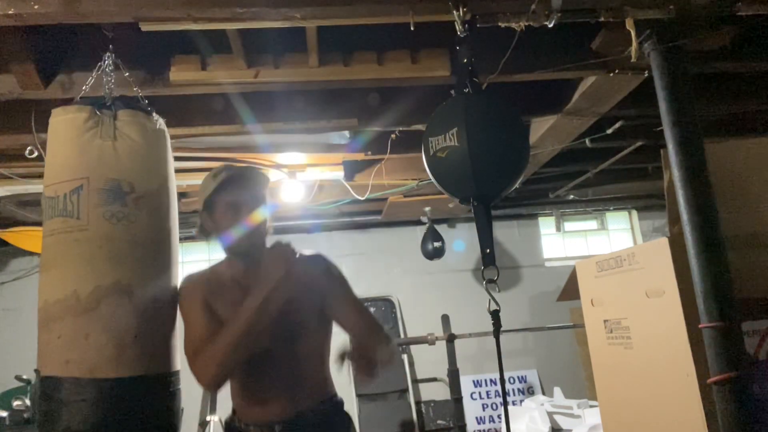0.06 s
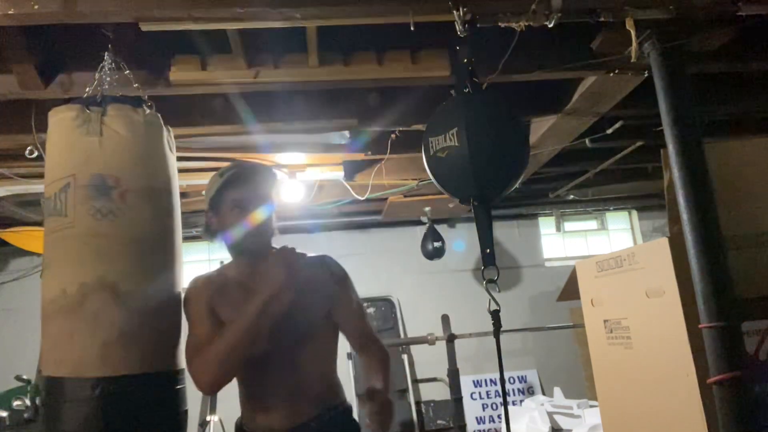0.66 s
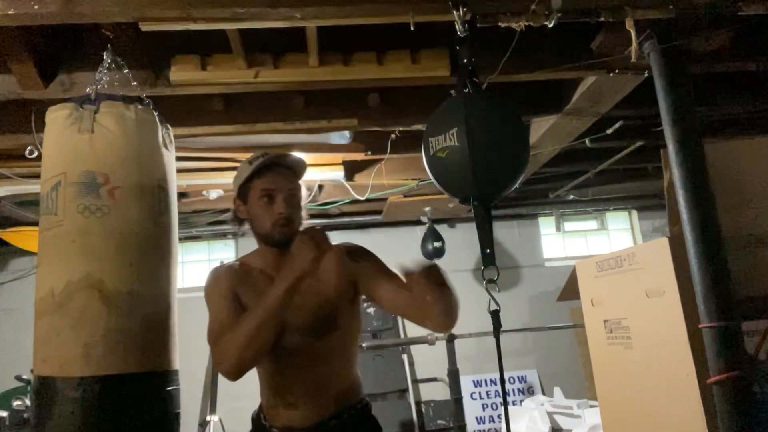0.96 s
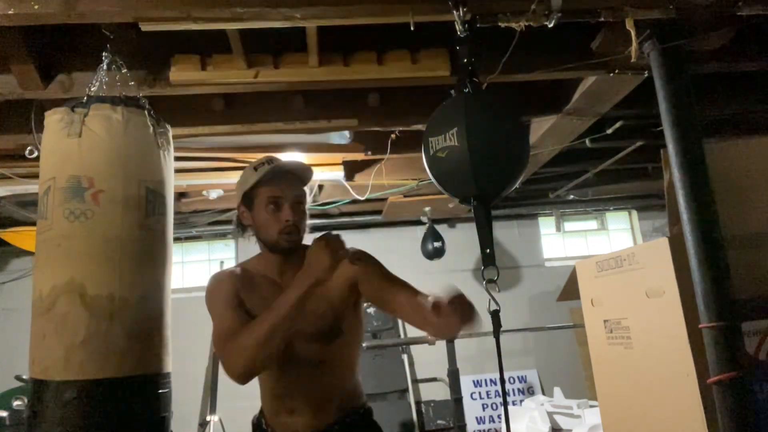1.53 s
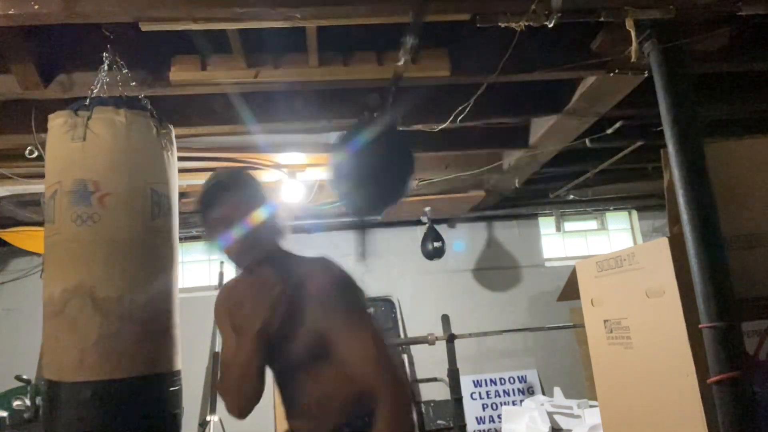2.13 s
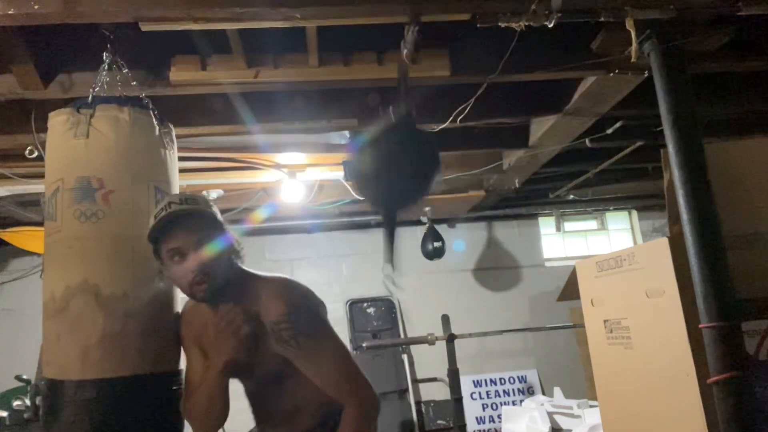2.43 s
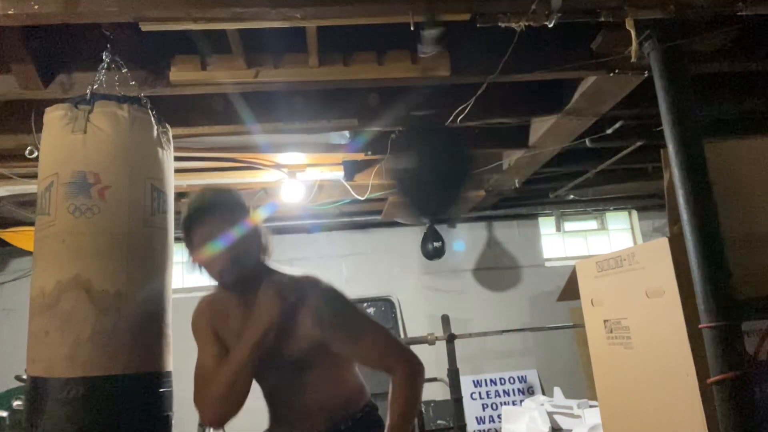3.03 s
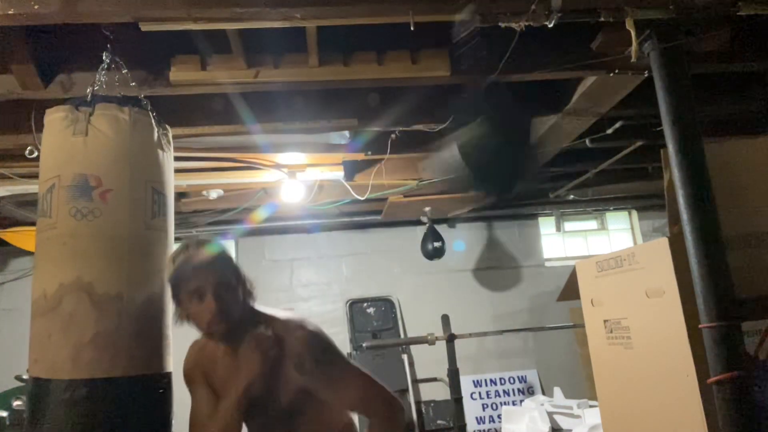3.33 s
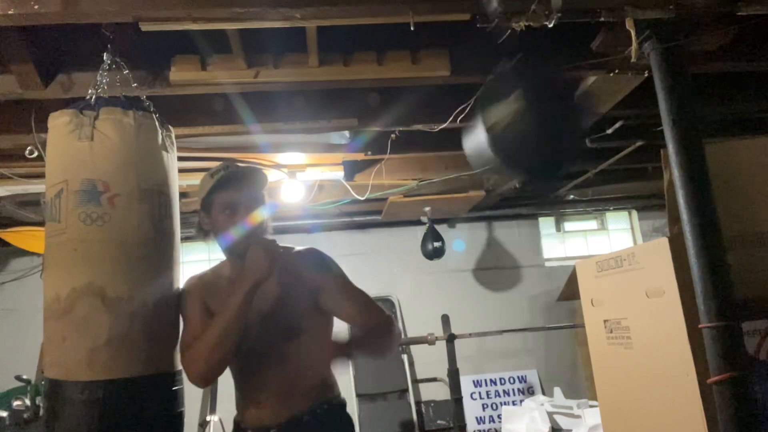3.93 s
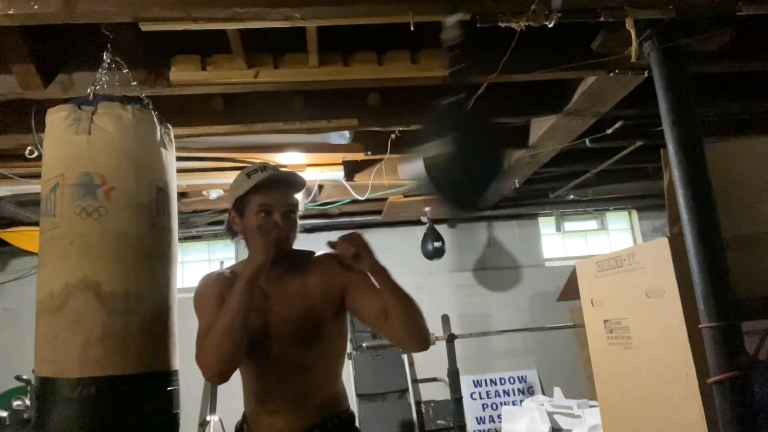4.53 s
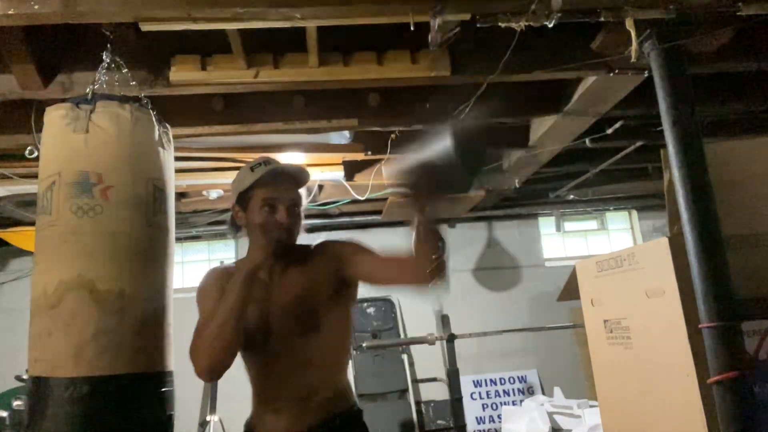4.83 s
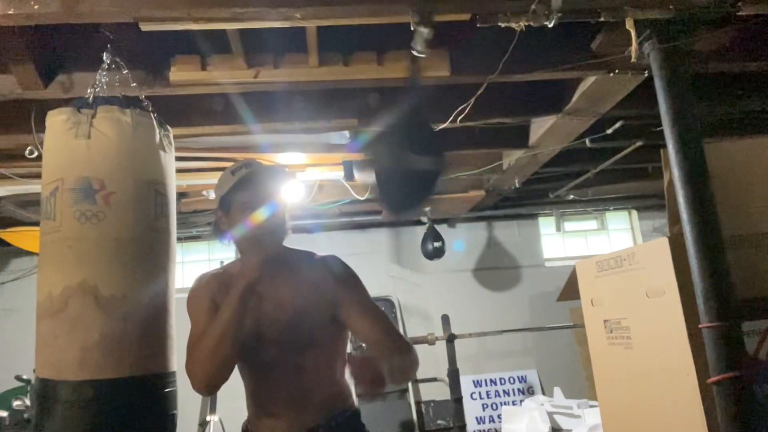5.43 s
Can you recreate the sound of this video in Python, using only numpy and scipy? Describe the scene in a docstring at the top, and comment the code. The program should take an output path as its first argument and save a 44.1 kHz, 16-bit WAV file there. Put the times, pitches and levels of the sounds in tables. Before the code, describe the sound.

Shoes scuff faintly over a low electrical hum in a basement gym. A bare fist then hits a corded boxing bag with a slap and a deep boom. The bag whips about, its steel hooks clanking, then settles into a swing with quick, light strap knocks and rubs. Near the end a second punch brings more clanks and brief squeaks. The room adds a short reverberation.

```python
"""A double-end bag in a low basement gym. Over a mains hum, a distant drone sinks away, shoes scuff and
one dull knock sounds. At 1.9 s a bare fist strikes: the cover slaps, and the bag's air and the joists
boom. The bag whips on its cords, so the steel hooks clank and squeak; it settles into a swing in which
the straps knock and rub. At 4.8 s a second punch sets the hooks clanking again. The room adds a short
reverberation."""
import sys
import numpy as np
from scipy import signal
from scipy.fft import rfft, irfft, next_fast_len
from scipy.io import wavfile
from scipy.ndimage import uniform_filter1d, map_coordinates

SR = 44100
rng = np.random.default_rng(int(sys.argv[2]) if len(sys.argv) > 2 else 0)


def int16_out(signal):
    """Quantize to a 16-bit WAV file."""
    q = np.round(np.clip(np.atleast_2d(signal).T, -1, 1) * 32767)
    wavfile.write(sys.argv[1], SR, q.astype(np.int16))


N = 245637
T = np.arange(SR // 2) / SR  # time within one event [s]

# fist on the bag: (time [s], slap [dB], boom [dB], crack [dB], slap pitch [Hz], thud [dB])
PUNCHES = [(1.911, -18, -8.5, -32.5, 600, -21.5), (4.825, -13, -15.5, -29.5, 1454, -20)]
# one dull knock before the first punch, then strap jerks, about six a second in the steady swing:
# (time [s], relative level [dB], pitch [Hz])
KNOCKS = [(1.82, -37.5, 490), (1.96, -17.5, 710), (2.175, -19.5, 704), (2.281, -30.5, 582),
          (2.487, -32, 1200), (2.588, -27, 856), (2.809, -31.5, 550), (2.87, -31, 680), (2.955, -32, 953),
          (3.053, -34, 766), (3.156, -25, 850), (3.33, -29, 820), (3.501, -29.5, 615), (3.718, -29, 830),
          (3.858, -31, 844), (4.042, -30, 640), (4.204, -33.5, 710), (4.379, -34.5, 720), (4.558, -36, 690),
          (4.72, -32, 885), (5.085, -26, 1130), (5.159, -29, 1190), (5.316, -31.5, 690), (5.49, -37.5, 710)]
# bright contact noise: (frequency [Hz], level [dB])
HISS = [(1200, -23.5), (2500, 8), (5000, -7.5), (10000, -9.5), (14000, -18.5)]


def amp(db):
    """Decibels to amplitude ratio."""
    return 10 ** (np.asarray(db) / 20)


def unit(x):
    """Normalisation to rms 1."""
    return x / np.sqrt(np.mean(x ** 2) + 1e-20)


def crest(x):
    """Normalisation of the loudest 3 ms to rms 1."""
    return x / np.sqrt(uniform_filter1d(x * x, size=132).max() + 1e-20)


def along(points, hz):
    """Interpolation of (frequency [Hz], value) points on a logarithmic axis."""
    frequencies, values = np.transpose(points)
    return np.interp(np.log(hz + 1), np.log(frequencies + 1), values)


def curves(rows):
    """Linear interpolation in time: one value per sample for each column after the first."""
    times, *columns = np.transpose(rows)
    return [np.interp(np.arange(N) / SR, times, column) for column in columns]


def wobble(rate, size):
    """Smooth random modulation: a spline through rate Gaussian knots a second."""
    knots = rng.standard_normal(int(size * rate / SR) + 4)
    return map_coordinates(knots, [np.arange(size) * rate / SR])


def filtered(x, response):
    """Linear filtering: the spectrum of x times a frequency response."""
    size = next_fast_len(x.shape[-1] + 8192)
    return irfft(rfft(x, size) * response(np.fft.rfftfreq(size, 1 / SR)), size)[..., :x.shape[-1]]


def noise(spectrum, size, lift=lambda hz: 0):
    """Spectral shaping of white noise, at rms 1; lift adds dB by frequency."""
    return unit(filtered(rng.standard_normal(size), lambda hz: amp(along(spectrum, hz) + lift(hz))))


def hump(centre_hz, octaves, db):
    """A resonance as a bell curve of decibels over log frequency."""
    return lambda hz: db * np.exp(-(np.log2((hz + 1) / centre_hz) / octaves) ** 2)


def fade(t60, attack):
    """Exponential decay by 60 dB in t60 seconds, with a rounded onset."""
    return amp(-60 * T / max(t60, .002)) * (1 - np.exp(-T / attack))


def swell(half_s):
    """Gaussian envelope of a stroke, highest in the middle of T."""
    return np.exp(-((T - T.mean()) / half_s) ** 2)


def add(track, s, x):
    """Superposition of x on the track at s seconds."""
    part = track[max(round(s * SR), 0):][:len(x)]
    part += x[:len(part)]


def dispersed(x, lag):
    """Dispersion: low bending waves travel slower; lag is the group delay [s] at 500 Hz."""
    return filtered(x, lambda hz: np.exp(-4j * np.pi * lag * np.sqrt(500 * hz)))


def diffuse(a, b):
    """A diffuse field from two independent signals, nearly coherent in the bass."""
    # likeness of left and right: (frequency [Hz], correlation [-1 to 1])
    coherence = [(60, 0.85), (200, 0.65), (600, 0.33), (2500, -0.29), (7500, 1), (12500, 0.19)]
    angle = lambda hz: np.arccos(np.clip(along(coherence, hz), -1, 1)) / 2
    mid = filtered(a, lambda hz: np.cos(angle(hz)))
    side = filtered(b, lambda hz: np.sin(angle(hz)))
    return np.array([mid + side, mid - side])


def placed(x, left_db):
    """Stereo placement: a frequency-dependent phase shift between channels, a little louder at left."""
    # phase between the channels: (frequency [Hz], lead of the left [rad])
    phase_lead = [(0, 0), (2600, -2.7), (4000, -6.2), (5200, -7.0), (6500, -6.4), (9500, -6.2),
                  (14000, -3.9)]
    lead = lambda hz: np.interp(hz, *np.transpose(phase_lead))
    stereo = filtered(x, lambda hz: np.exp(1j * lead(hz) * np.array([[.5], [-.5]])))
    return stereo * amp([[left_db], [-left_db]])


def basement(x):
    """Reverberation: strong early reflections, then a short tail, drawn anew every quarter second."""
    # decay of the room: (frequency [Hz], t60 [s])
    decay_times = [(100, 0.057), (500, 0.61), (2000, 0.56), (7000, 0.42), (13000, 0.26)]
    onset = np.clip(T / 0.0076 - .4, 0, 1)
    early_lift = 1 + 4.6 * np.exp(-T / 0.027)  # near joists and walls
    out, block = np.zeros((2, N)), SR // 4
    for start in range(0, N, block):  # the moving bag alters the reflections
        hz, t, spectra = signal.stft(rng.standard_normal((2, len(T))), SR, nperseg=256)
        decay = amp(-60 * t / along(decay_times, hz)[:, None])
        tails = signal.istft(spectra * decay, SR, nperseg=256)[1][:, :len(T)]
        for side, response in zip(out, diffuse(*tails) * onset * early_lift):
            echoes = signal.fftconvolve(x[start:start + block], response / np.linalg.norm(response))
            add(side, start / SR, echoes)
    return out


def still_air():
    """Ambient noise: a steady diffuse field, strongest in the bass."""
    # the quiet room: (frequency [Hz], level [dB])
    spectrum = [(15, -53), (25, -2), (60, -14), (104, -9), (186, -7.5), (269, -21.5), (535, -29),
                (861, -36), (1350, -34.5), (1900, -54.5), (9270, -55.5), (12400, -59.5), (13800, -70)]
    return amp(-52.5) * diffuse(noise(spectrum, N), noise(spectrum, N))


def mains_hum():
    """Near-harmonic partials of the mains, slightly modulated in amplitude and phase."""
    # hum tones: (frequency [Hz], relative level [dB])
    partials = [(59.2, -48.5), (118.4, -58), (183.0, -57), (296.1, -73)]
    # slow swell and dip of the hum: (time [s], gain [dB])
    contour = [(0, -3.5), (.5, -0.5), (.6, -1.5), (2.5, 0.5), (3.2, -12), (3.7, -3), (5.57, 1)]
    t, hum = np.arange(N) / SR, np.zeros(N)
    for hz, db in partials:
        gain = amp(db + 4 + 0.35 * wobble(14, N))
        hum += gain * np.sin(2 * np.pi * hz * t + 0.001 * hz * wobble(12, N))
    return amp(curves(contour)[0]) * hum


def distant_drone():
    """A glide: a fundamental and its second harmonic sink in pitch and fade."""
    # course of the drone: (time [s], pitch [Hz], relative level [dB])
    glide = [(0, 105.5, -48.5), (.08, 102.5, -50), (.18, 100.7, -50), (.3, 88.1, -58), (.48, 78, -57),
             (.58, 62.9, -69), (.7, 58.6, -94)]
    hz, db = curves(glide)
    phase = 2 * np.pi * np.cumsum(hz) / SR
    return amp(db + 8 + 2.5 * wobble(4.6, N)) * (np.sin(phase) + amp(-10.5) * np.sin(2 * phase))


def drone_rush():
    """Exponential decay of a soft diffuse noise that dies away with the drone."""
    # the rush: (frequency [Hz], level [dB])
    spectrum = [(150, -38.5), (250, -5), (538, -9), (590, -12.5), (1300, -17.5), (2090, -25), (4000, -37),
                (5200, -69), (8800, -120)]
    start_db, fall_db_per_s = -55, 16.5
    envelope = amp(start_db - fall_db_per_s * np.arange(N) / SR)
    return envelope * diffuse(noise(spectrum, N), noise(spectrum, N))


def rig_rustle():
    """Damped motion: each punch whips the rig into a rustle that settles with the slowly dying swing."""
    # the moving rig: (frequency [Hz], level [dB])
    spectrum = [(120, -15.5), (200, -7.5), (275, -20), (729, -9), (810, -14.5), (2000, -19.5), (4600, -35),
                (12200, -37), (13800, -51.5)]
    whip_db, whip_db_per_s, rise_s = -35.5, 40, 0.13
    swing_db, swing_db_per_s = -47, 5.5
    envelope = np.zeros(N)
    for s, *_ in PUNCHES:
        age = np.maximum(np.arange(N) / SR - s, 0)
        rise, settling = np.minimum(age / rise_s, 1), np.maximum(age - rise_s, 0)
        whip = amp(whip_db - whip_db_per_s * settling)
        swing = amp(swing_db - swing_db_per_s * settling)
        envelope = np.hypot(envelope, rise * np.hypot(whip, swing))  # powers add
    flutter = amp(2.3 * wobble(30, N))
    return envelope * flutter * diffuse(noise(spectrum, N), noise(spectrum, N))


def shoe_scuffs():
    """Sliding friction of shoes on concrete: short, faint scuffs, some bright and some dull."""
    # steps: (time of peak [s], level [dB], half length [s], dullness [dB])
    steps = [(0.045, -77, 0.012, 15), (0.37, -57, 0.012, -1), (0.477, -55, 0.018, -3),
             (0.548, -58.5, 0.012, 16), (0.651, -61, 0.016, -1), (0.753, -67.5, 0.041, 45),
             (1.301, -60, 0.0084, 54), (1.518, -51.5, .028, -0.5), (1.744, -49.5, 0.046, 12.5)]
    # sole on the floor: (frequency [Hz], level [dB])
    spectrum = [(200, -7.5), (500, -3), (2500, 2), (6000, -12.5), (10000, -9.5), (14000, -20.5)]
    out = np.zeros(N)
    for s, db, half_s, dull_db in steps:
        friction = noise(spectrum, len(T), hump(1000, octaves=2.1, db=dull_db))
        add(out, s - T.mean(), amp(db) * swell(half_s) * friction)
    return out


def strap_rubs():
    """Sliding friction: straps drag over their fittings in short, grainy swells."""
    # strokes: (time of peak [s], relative level [dB], half length [s], hiss against rub [dB])
    strokes = [(2.732, -39, 0.04, -12), (3.075, -34.5, 0.0075, -3.5), (3.155, -34, 0.013, -6.5),
               (3.557, -35.5, 0.013, -13.5), (3.559, -44.5, 0.05, -3), (3.736, -43, 0.033, -10),
               (3.772, -31.5, 0.0084, -7.5), (3.937, -42.5, 0.0067, -10.5), (4.291, -43.5, 0.0071, -10.5),
               (4.428, -39.5, 0.0058, -28), (4.651, -45.5, 0.01, -6.5), (4.783, -37.5, 0.0075, -14)]
    # strap on fitting: (frequency [Hz], level [dB])
    spectrum = [(150, -13), (250, -17.5), (496, -16.5), (771, -10.5), (920, -21), (1150, -10.5),
                (1630, -19.5), (2180, -17), (3500, -36), (4550, -57.5), (7700, -120)]
    out = np.zeros(N)
    for s, db, half_s, hiss_db in strokes:
        grain = amp(0.61 * wobble(312, len(T)))
        friction = noise(spectrum, len(T)) + amp(hiss_db) * noise(HISS, len(T))
        add(out, s - T.mean(), amp(db - 0.5) * swell(half_s) * unit(grain * friction))
    return out


def squeaks():
    """Stick-slip oscillation: loaded joints sing with a rough tone of unsteady pitch."""
    # slips of steel and straps: (time [s], relative level [dB], length [s], start [Hz], end [Hz])
    slips = [(2.245, -30.5, 0.034, 309, 233), (3.55, -26.5, 0.016, 831, 740),
             (4.045, -44.5, 0.041, 938, 1653), (4.38, -44, 0.019, 743, 1465), (4.73, -47, 0.045, 1276, 930),
             (4.817, -46, .02, 1890, 1720), (4.998, -29.5, 0.042, 1220, 1270),
             (5.026, -29.5, 0.034, 3916, 3802), (5.114, -38.5, 0.021, 4130, 4330)]
    swivel_resonance = hump(7730, octaves=.06, db=33)  # lifts an octave that falls on it
    out = np.zeros(N)
    for s, db, length, start_hz, end_hz in slips:
        octave_db = -18.5 + swivel_resonance(start_hz + end_hz)  # at twice the mean pitch
        progress = np.clip(T / length, 0, 1)
        hz = (start_hz + (end_hz - start_hz) * progress) * (1 + .014 * wobble(1200, len(T)))
        phase = 2 * np.pi * np.cumsum(hz) / SR
        # steel on steel rasps; the lower strap creaks are smoother
        rasp = 1 + .5 * wobble(900, len(T)) * (start_hz > 2000)
        overtones = np.sin(2 * phase) + amp(-14.5) * wobble(1500, len(T)) * np.sin(3 * phase)
        tone = rasp * np.sin(phase) + amp(octave_db) * overtones
        envelope = np.abs(np.sin(np.pi * progress)) ** 0.21
        stutter = amp(3 * wobble(300, len(T)))
        add(out, s, amp(db - 0.5) * tone * envelope * stutter)
    return out


def knock(hz, t60, edge_db):
    """Impulsive excitation: a noise burst and a brief tone, which dispersion makes chirp downward."""
    # the knock: (frequency [Hz], level [dB])
    spectrum = [(150, -24.5), (250, -2.5), (1330, 0.5), (1800, -12), (2660, -13), (2930, -26.5),
                (7030, -30), (8000, -24), (11400, -33.5), (12000, -25.5), (15600, -40), (22000, -120)]
    body, edge = hump(hz, octaves=0.2, db=9.5), hump(3300, octaves=0.99, db=edge_db)
    envelope = fade(0.54 * t60, attack=.00028) + amp(-10) * fade(t60, attack=.0021)
    burst = noise(spectrum, len(T), lambda f: body(f) + edge(f)) * envelope
    pluck = np.sin(2 * np.pi * hz * T) * fade(t60=.011, attack=.0004)
    return crest(dispersed(crest(burst) + amp(-1) * crest(pluck), lag=.004))


def knocks():
    """Impact and softer rebound: one dull knock before the first punch, then strap jerks in the swing."""
    usual_db, usual_hz, usual_t60 = -29.5, 694, 0.092
    halving_db, edge_db_per_octave = 25.5, 14.5
    out = np.zeros(N)
    for s, db, hz in KNOCKS:
        force_db = db - usual_db
        t60 = usual_t60 * 2 ** (-force_db / halving_db)  # a harder knock stops sooner
        edge_db = edge_db_per_octave * np.log2(hz / usual_hz)  # a higher knock has a harder edge
        rebound_s = .044 + .0006 * force_db
        pair = knock(hz, t60, edge_db)
        add(pair, rebound_s, amp(-5.5) * knock(hz, t60, edge_db + 1))
        add(out, s - .003, amp(db - 4.5) * pair)
    return out


def ring(modes, scatter_db, attack):
    """Damped modes at random strengths; loose contact makes their phases drift, the high ones most."""
    out = np.zeros(len(T))
    for hz, db, t60 in modes:
        envelope = amp(db + scatter_db * rng.normal()) * fade(t60, attack)
        cycles = hz * T + rng.random()
        drift = np.cumsum(rng.standard_normal(len(T))) * .002 * np.sqrt(hz / 7000)
        out += envelope * np.sin(2 * np.pi * (cycles + drift))
    return out


def clank(low_db, top_db, high_db):
    """Impact and free vibration: hook meets eye in a chattering clash, and the steel rings on."""
    # contacts within one clank: (delay [s], relative level [dB])
    chatter = [(0, -1.5), (.0065, -4), (.013, -14)]
    # steel striking steel: (frequency [Hz], level [dB])
    clash_spectrum = [(410, -49.5), (700, -16.5), (898, -10), (1150, 1), (1700, -14.5), (1850, -0.5),
                      (2900, -5.5), (3160, -11.5), (4660, -10.5), (5280, -5), (6600, -9.5), (7570, 1),
                      (9360, -11), (11900, -1), (13800, -9.5)]
    # modes of the hook: (frequency [Hz], level [dB], t60 [s])
    modes = [(332.8, -14.5, 0.16), (934.4, -3, 0.14), (921, -3.5, 0.095), (1155, 3.5, 0.05),
             (1229, -4, 0.17), (1233, -2, 0.076), (1853, 1.5, 0.07), (2030, -13.5, 0.42),
             (2215, -10.5, 0.25), (2504, -12, 0.24), (4180, -15.5, 0.18), (4760, -30, 0.62),
             (5280, -9, 0.16), (6920, -17.5, 0.15), (7690, -25.5, .2), (7640, 6, 0.066), (7814, -5, 0.15),
             (7770, -9, 0.1), (11200, -22.5, .13), (12700, -4.5, 0.051)]
    out, top = np.zeros(len(T)), hump(13000, octaves=1, db=top_db)
    for delay, contact_db in chatter:
        clash = noise(clash_spectrum, len(T), top) * fade(t60=.035, attack=.0005)
        add(out, delay, amp(contact_db - 5) * crest(clash))
    high_modes = [(hz, db + top(hz), t60) for hz, db, t60 in modes if hz > 3000]
    low_modes = [(hz, db, t60) for hz, db, t60 in modes if hz <= 3000]
    high = ring(high_modes, scatter_db=2, attack=.001)
    low = ring(low_modes, scatter_db=2, attack=.003)
    return out + amp(high_db - 11.5) * crest(high) + amp(low_db - 3) * crest(low)


def hook_clanks():
    """Tension impulses: hooks clank as the cords snap taut, and clink as straps knock in the swing."""
    # snaps, in relative levels: (time [s], level [dB], low ring [dB], top lift [dB], high ring [dB])
    snaps = [(1.9754, -5.5, -22.5, -0.5, -5), (2.0479, -17, -6, 3.5, -22), (2.1251, -9, -8, -2.5, -16),
             (2.3084, -8.5, -8.5, 2, 0), (2.3476, -14, -7.5, -8, -0.5), (2.48, -38.5, -7, 19, -13),
             (2.5922, -32.5, -3.5, -2.5, -9), (2.742, -38, -11, 7, -2), (2.9502, -34, -2.5, -5.5, -27),
             (3.2057, -41, 2, 4, -10), (3.8626, -44.5, -3.5, 32, 9.5), (4.895, -9, -11, 4, -2),
             (5.2351, -12.5, -9, 6, 2)]
    out = np.zeros(N)
    for s, db, low_db, top_db, high_db in snaps:
        add(out, s, amp(db) * clank(low_db, top_db, high_db))
    first_punch_s = PUNCHES[0][0]
    for s, *_ in KNOCKS:
        if s > first_punch_s:
            clink_db = -56 + 6 * rng.normal()
            add(out, s, amp(clink_db) * clank(low_db=5, top_db=9, high_db=-6))
    return out


def bag_booms():
    """Resonance: the bag's air takes up the push a moment after contact, and the joists rumble on."""
    # modes of bag and joists: (frequency [Hz], level [dB], t60 [s])
    modes = [(54.9, -4.5, 0.37), (65.5, -0.5, 0.18), (92.3, -12.5, 0.44), (173, -14, 0.21),
             (240.3, -22, 0.17), (335.4, -24.5, 0.29)]
    # shaken joists: (frequency [Hz], level [dB])
    rumble_spectrum = [(30, -13.5), (55, -0.5), (85, -9), (120, -7), (175, -14), (260, -17.5), (500, -19),
                       (1200, -68)]
    out = np.zeros(N)
    for s, _, boom_db, *_ in PUNCHES:
        boom = sum(amp(db) * fade(t60, attack=.0028) * np.sin(2 * np.pi * hz * T)
                   for hz, db, t60 in modes)
        rumble = noise(rumble_spectrum, len(T)) * fade(t60=.93, attack=.01)
        add(out, s + .0075, amp(boom_db) * (crest(boom) + amp(-14.5) * rumble))
    return out


def punches():
    """Impact on a membrane: knuckles crack, the cover slaps, and the dent spreads with a hollow thud."""
    # skin of the cover: (frequency [Hz], level [dB])
    slap_spectrum = [(71, -40), (120, 1), (611, -25.5), (675, -25.5), (745, -25.5), (823, -12), (945, -14),
                     (1350, -14), (1700, -27.5), (2250, -21.5), (2800, -56.5), (8230, -37), (13800, -40.5)]
    # the dented cover: (frequency [Hz], level [dB])
    thud_spectrum = [(90, -25.5), (160, -0.5), (240, -2), (330, -7.5), (600, -5.5), (800, -2), (1200, -31)]
    out = np.zeros(N)
    for s, slap_db, _, crack_db, hz, thud_db in PUNCHES:
        slap = noise(slap_spectrum, len(T), hump(hz, octaves=0.36, db=12)) * fade(t60=.035, attack=.0023)
        thud = noise(thud_spectrum, len(T)) * fade(t60=.17, attack=.0026)
        crack = noise(HISS, len(T)) * fade(t60=.095, attack=.00025)
        body = amp(slap_db) * crest(slap) + amp(thud_db) * crest(thud)
        add(out, s, dispersed(body, lag=.0013) + amp(crack_db) * crest(crack))
    return out


def scene():
    """Superposition of direct sound, reverberation and background."""
    fist, steel = punches(), hook_clanks()
    contacts = knocks() + strap_rubs() + shoe_scuffs()
    joints = squeaks()
    bass_balance = amp([[.7], [-.7]])  # slightly louder on the left
    direct = placed(fist + contacts, left_db=1.53) + placed(steel + joints, left_db=0.7)
    direct += bag_booms() * bass_balance
    room = basement(amp(-4) * (fist + contacts) + amp(-4.5) * steel + amp(-7) * joints)
    background = (mains_hum() + distant_drone()) * bass_balance + still_air() + drone_rush()
    return direct + room + background + rig_rustle()


def record(dry):
    """Band limiting: steep filters remove the deepest bass and the highest treble."""
    low_hz, top_hz = 40, 13900
    lean = signal.sosfilt(signal.butter(6, low_hz, "high", fs=SR, output="sos"), dry)
    return filtered(lean, lambda hz: 1 / np.sqrt(1 + (hz / top_hz) ** 120))


dry = scene()
out = record(dry)
int16_out(out)
```